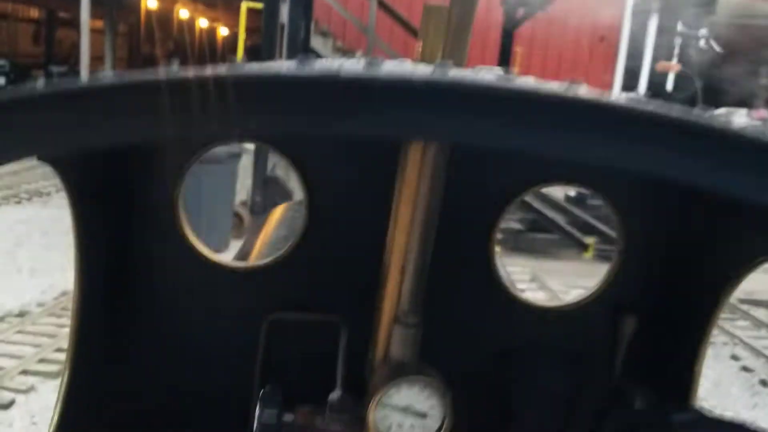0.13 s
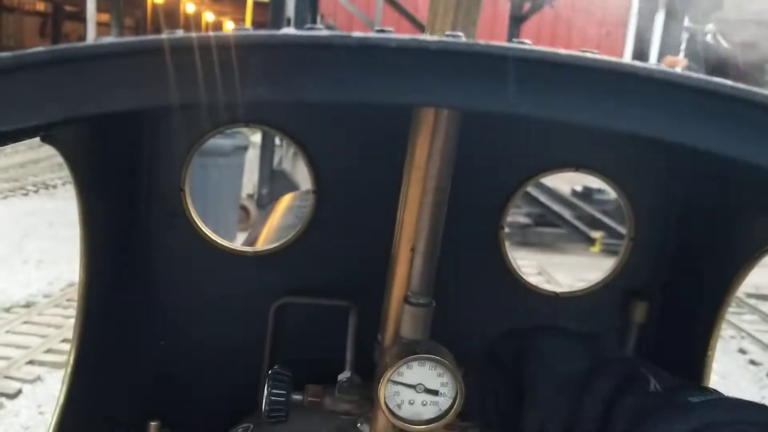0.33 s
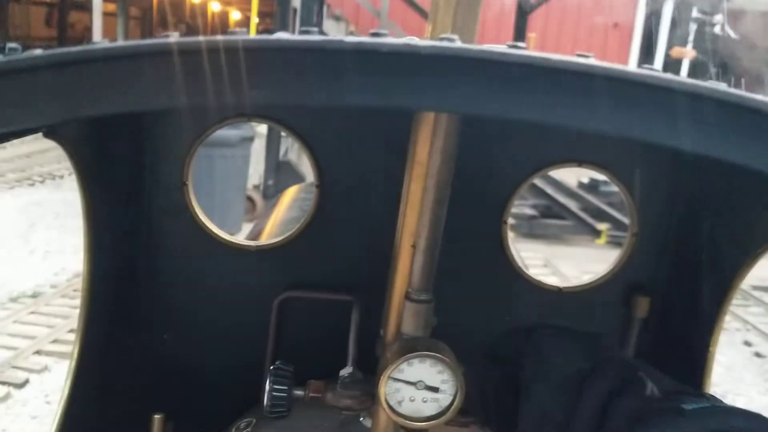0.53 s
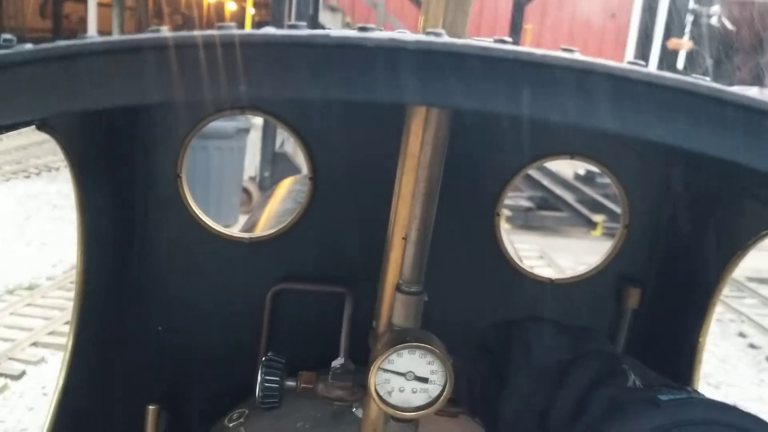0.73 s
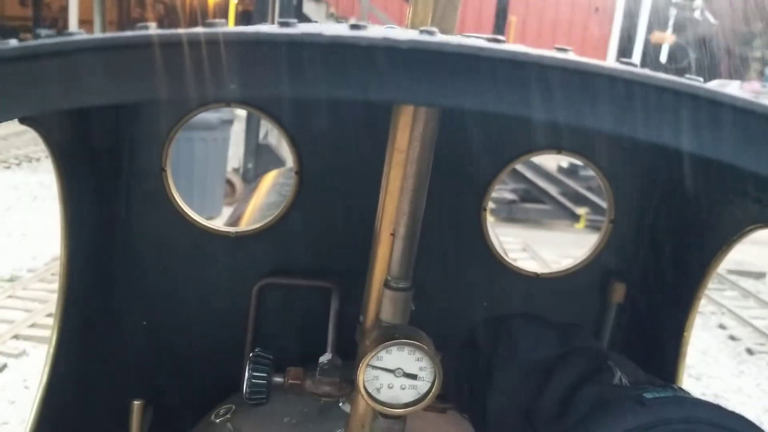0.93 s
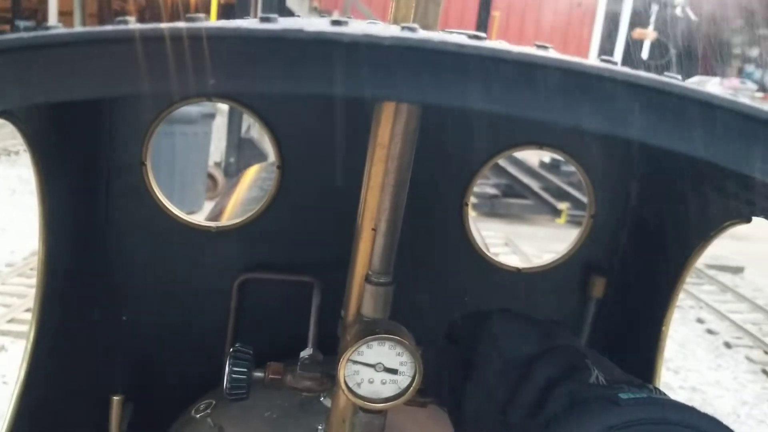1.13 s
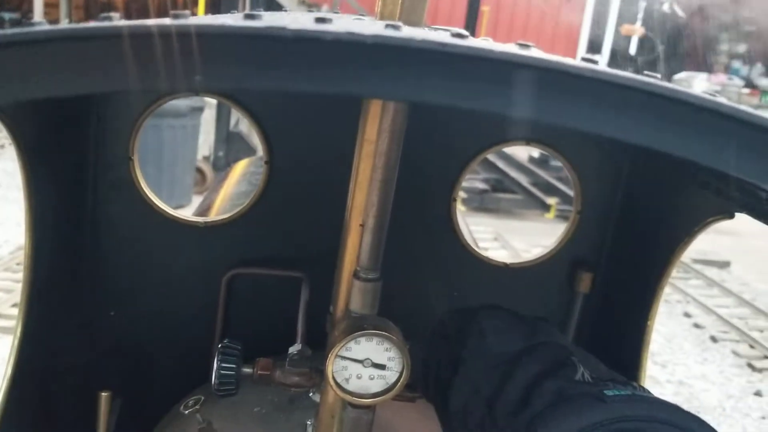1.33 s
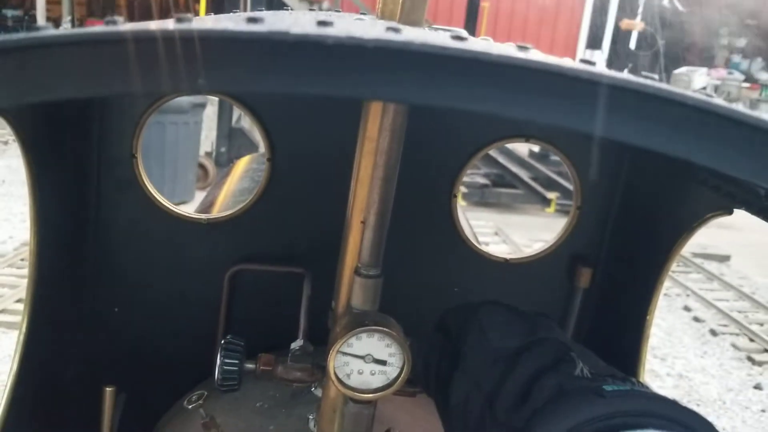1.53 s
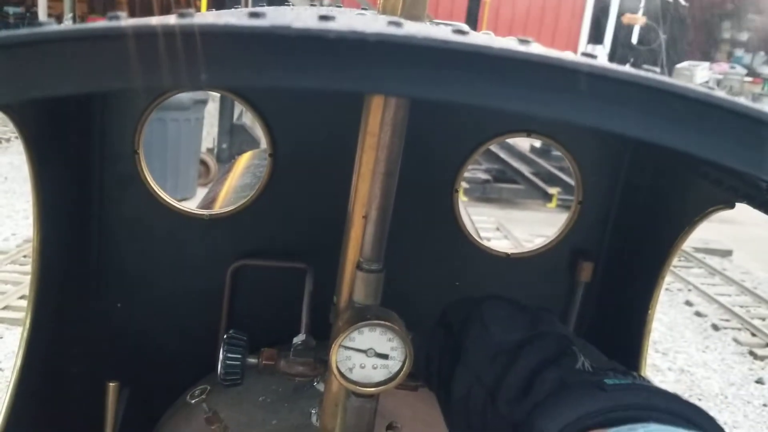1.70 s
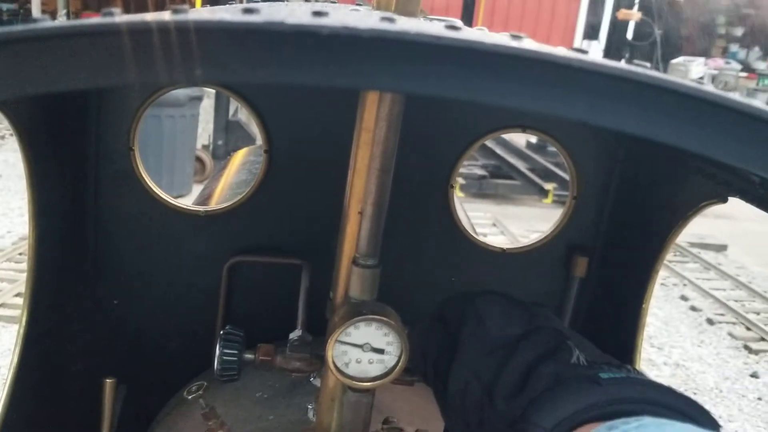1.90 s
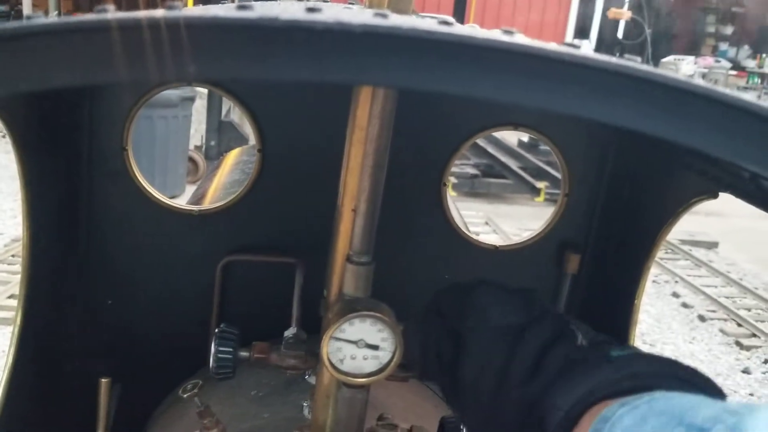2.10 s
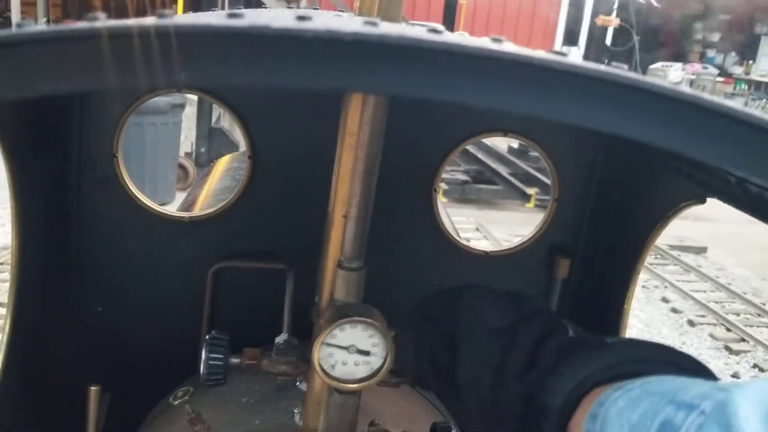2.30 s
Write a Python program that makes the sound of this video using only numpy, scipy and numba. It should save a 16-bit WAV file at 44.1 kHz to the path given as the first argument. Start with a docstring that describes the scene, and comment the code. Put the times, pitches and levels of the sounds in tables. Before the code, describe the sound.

A small locomotive's steam whistle, close up in an open cab. Faint rumble, hum, soft bumps and a tiny scrape come first. At 0.2 seconds steam hisses and splutters, breathy with a hint of pitch, growing. Around 1.0 it locks into a loud, shrill, slightly fluttering high note with bright hiss, held until 2.06, then sags and stops by 2.15, leaving faint echo, thin hiss and rumble.

```python
"""A small steam locomotive's whistle, heard from the cab. Throughout: a hum, a low rumble, a thin hiss from the
valve and a few soft bumps. After a brief scrape the valve opens slowly: coloured noise hisses and splutters, and
noise in resonances only hints at the pipe's note. Then it speaks as jittering sine harmonics, holds for a second
and sags in pitch as the valve shuts. Faint echoes follow; gain control turns everything down as it swells."""
import sys
import numpy as np
from scipy import signal
from scipy.fft import rfft, irfft
from scipy.io import wavfile
from scipy.ndimage import uniform_filter1d, minimum_filter1d
from numba import njit

SR = 44100
rng = np.random.default_rng(int(sys.argv[2]) if len(sys.argv) > 2 else 0)


def pcm_store(signal):
    """Save signal as 16-bit PCM."""
    levels = np.round(np.clip(np.atleast_2d(signal), -1, 1) * 32767)
    wavfile.write(sys.argv[1], SR, levels.astype(np.int16).T)


N = 103635

# The pipe's steady note. Each row: time in seconds, level in dB.
NOTE_LEVEL = [(.975, -31), (.997, -6), (1.012, -0.5), (1.026, 10), (1.055, 4), (1.075, 7.5), (1.11, 10.5),
              (1.4, 16.5), (2.06, 20), (2.12, 9.5), (2.14, -0.5), (2.16, -51)]
# Pitch: rises as steam drives out the air, sags as pressure goes. Each row: time in seconds, pitch in Hz.
PIPE_PITCH = [(.2, 1546), (.42, 1535), (.7, 1595), (1.02, 1618), (1.15, 1598), (1.45, 1596), (2.055, 1592),
              (2.09, 1543), (2.12, 1505), (2.15, 1436)]
# Harmonics of the note. Each row: multiple, level in dB, left minus right in dB, settled flutter as a share.
NOTE_HARMONICS = [(1, -2.5, 11.5, 0.057), (2, -34, 19.5, 0.17), (3, -20, 9.5, 0.26), (4, -48, -15.5, 0.27),
                  (5, -42, -13, 0.46)]
# Steam ringing the pipe without a steady note. Each row: time in seconds, left level in dB, width in Hz.
BREATHY_RING = [(0, -50, 250), (.17, -48, 250), (.22, -28.5, 221), (.5, -22.5, 169), (.78, -17, 70.7),
                (.98, -12.5, 50), (1.4, -16, 70), (2.06, -15.5, 70.8), (2.15, -31, 70), (2.35, -60, 69)]
# Upper resonances of the pipe. Each row: centre in Hz, width in Hz, level in dB.
UPPER_RESONANCES = [(4720, 240, 1), (5254, 220, -5)]
# Swell of the upper resonances. Each row: time in seconds, level in dB.
UPPER_SWELL = [(.17, -65), (.22, -38.5), (.39, -37), (.45, -26), (.98, -17), (1.4, -15.5), (2.06, -32.5),
               (2.13, -38), (2.35, -64)]
# Steam jet. Each row: time in seconds, level in dB.
JET_LEVEL = [(0, -42), (.18, -37), (.222, -12.5), (.285, -13), (.38, -15.5), (.45, -9), (.98, -1),
             (1.2, 0.5), (1.4, 1), (2.06, 2), (2.1, -12), (2.15, -28), (2.35, -35)]
# Colour of the jet. Each row: frequency in Hz, left in dB, right in dB.
JET_COLOUR = [(100, -35, -22.5), (300, -35.5, -36.5), (745, -23, -24), (1310, -16, -29.5),
              (1960, -41.5, -43), (2152, -12, -27.5), (2570, -33, -27.5), (3050, -20.5, -21),
              (3556, -23.5, -35.5), (3907, -15.5, -22), (4900, -20, -26), (5300, -23, -20),
              (6320, -27.5, -20.5), (7690, -30.5, -11), (8720, -14, -16), (9700, -18.5, -2.5),
              (9900, -17.5, -1.5), (11400, -18.5, -2.5), (12730, -13.5, -2), (13500, -26.5, -15.5),
              (15470, -31, -7.5)]
# Wet steam through the half-open valve, on opening and closing. Each row: time in seconds, level in dB.
WET_STEAM_LEVEL = [(.178, -63), (.188, -28.5), (.27, -30.5), (.33, -29), (.6, -30), (1.0, -37.5),
                   (1.25, -62.5), (2.02, -54.5), (2.07, -28), (2.12, -29), (2.17, -53.5)]
# Colour of the wet steam. Each row: frequency in Hz, left in dB, right in dB.
WET_STEAM_COLOUR = [(100, -9, -15), (350, -3.5, -7.5), (756, 0, -4), (1100, -4, -12), (1500, 6.5, -10.5),
                    (1900, -6.5, -24), (2280, 4, -2), (3500, -6.5, -9), (7000, -14.5, -24.5),
                    (16000, -26, -33.5)]
# Leak of the valve. Each row: time in seconds, level in dB.
VALVE_LEAK_LEVEL = [(0, -54), (.2, -50), (2.35, -47.5)]
# Echoes: a short one within the cab and a long one from the yard beyond. Each row: level in dB, t60 in seconds,
# delay in seconds.
YARD_ECHOES = [(-29.5, 0.5, 0.004), (-40.5, 0.83, 0.044)]
# Colour of the standing engine's rumble. Each row: frequency in Hz, left in dB, right in dB.
RUMBLE_COLOUR = [(20.25, -20, -17.5), (42, 5, -11), (78.6, -3.5, -3.5), (159, -5.5, -10),
                 (250, -12.5, -17.5), (330, -16, -15), (600, -23.5, -30), (736, -20.5, -25),
                 (1040, -23, -38), (2330, -26.5, -39), (4860, -32, -44), (8000, -50.5, -49),
                 (16000, -52.5, -55)]
# Rumble. Each row: time in seconds, level in dB.
RUMBLE_SWELL = [(0, -30.5), (.25, -31.5), (.5, -34), (.95, -31.5), (1.5, -28), (2.35, -26.5)]
# Soft low bumps. Each row: start in seconds, level in dB, pitch in Hz, rise and decay constant in seconds.
SOFT_BUMPS = [(.003, -18.5, 69.4, 0.013), (.108, -23, 73, 0.0072), (.276, -13, 83.5, 0.0061),
              (0.636, -27, 70.2, .018), (.92, -24.5, 58, 0.034), (1.232, -14.5, 74.4, .012),
              (1.813, -0.5, 84, 0.0061)]

JITTER_HZ, JITTER_RATE_HZ, FLUTTER_RATE_HZ = 2.28, 125, 61  # jitter and flutter once settled
UNSTEADY_SHARE, SETTLE_S = 2.5, 0.23  # extra wobble when the pipe first speaks, and how fast it dies
FULL_PRESSURE_HZ, OVERTONE_LOSS_DB_PER_HZ = 1592, 0.3
BREATHY_PAN_DB, UPPER_PAN_DB = 9.5, 4  # all pans: left minus right
JET_LIKENESS, RUMBLE_LIKENESS = 0.78, 0.96  # share of noise power common to both sides
JET_FLICKER_DB, JET_FLICKER_RATE_HZ, SPIT_DB, SPIT_RATE_HZ = 0.93, 36, 1, 550
SPLUTTER_ROUGH_DB, SPLUTTER_RATE_HZ = 4.5, 78
LEAK_HZ, LEAK_WIDTH_HZ, LEAK_PAN_DB = 10880, 940, -13.5
PIPE_LAG_S, JET_LAG_S = 0.00017, 0.000354  # how much later the left microphone hears them
# the overtones carry into the yard better than the fundamental
ECHO_BRIGHT_HZ, ECHO_BRIGHT_WIDTH_HZ, ECHO_BRIGHT_DB = 4200, 1100, 8
HUM_HZ, HUM_DB, HUM_WAVER_DB, HUM_DRIFT_HZ = 227, -36, 0.5, 1.2
BUMP_PAN_DB, BUMP_NOISE_SHARE, BUMP_NOISE_HZ = 6.5, 0.26, 120
SCUFF_S, SCUFF_DB, SCUFF_HZ, SCUFF_WIDTH_S = 0.102, -37.5, 625, 0.0079
GAIN_THRESHOLD, GAIN_FALL_DB_PER_S = 0.31, 646.0  # fall per unit of excess over the threshold
LIMITER_CEILING, TOP_HZ = 0.97, 15800


def undb(db):
    """Amplitude factor for a level in dB."""
    return 10 ** (np.asarray(db) / 20)


def curve(table, axis=1):
    """A column of a table, joined by straight lines in time."""
    rows = np.array(table, float)
    return np.interp(np.arange(N) / SR, rows[:, 0], rows[:, axis])


def unit(x):
    """Scale to a standard deviation of 1."""
    return x / np.std(x)


def pan(db):
    """Left and right gains for a level difference."""
    return undb(np.array([[db], [-db]]) / 2)


def walk(rate_hz):
    """Smooth random wandering with a spread of 1."""
    f_hz = np.fft.rfftfreq(N, 1 / SR)
    spectrum = rfft(rng.standard_normal(N))
    return unit(irfft(spectrum / (1 + (2 * f_hz / rate_hz) ** 2), N))


def coloured(table, likeness):
    """Stereo noise with a spectrum for each side; the louder side has rms 1."""
    rows = np.array(table, float)
    f_hz = np.fft.rfftfreq(N, 1 / SR) + 1  # keeps the log finite
    common = np.sqrt(likeness) * rng.standard_normal(N)
    noise = common + np.sqrt(1 - likeness) * rng.standard_normal((2, N))
    gains = undb([np.interp(np.log(f_hz), np.log(rows[:, 0]), side_db) for side_db in rows.T[1:]])
    out = irfft(rfft(noise) * gains, N)
    return out / out.std(axis=1).max()


@njit
def resonate(x, hz, width_hz):
    """Band-pass, a state-variable filter whose centre and width move."""
    y, band, low = np.empty(len(x)), 0., 0.
    for i in range(len(x)):
        g = np.tan(np.pi * hz[i] / SR)
        damping = width_hz[i] / hz[i]
        v = (band + g * (x[i] - low)) / (1 + g * (g + damping))
        band = 2 * v - band
        low += 2 * g * v
        y[i] = damping * v
    return y


def ring(hz, width_hz):
    """Noise in a steep-sided resonance, rms 1."""
    hz, width_hz = hz * np.ones(N), width_hz * np.ones(N)
    noise = rng.standard_normal(N) / np.sqrt(width_hz)  # even level as the width moves
    return unit(resonate(resonate(noise, hz, width_hz), hz, 3 * width_hz))


def note():
    """The pipe locks on to a nearly pure tone, unsteady at first, its overtones fluttering."""
    pitch_hz, level_db = curve(PIPE_PITCH), curve(NOTE_LEVEL)
    age_s = np.maximum(np.arange(N) / SR - NOTE_LEVEL[1][0], 0)
    wobble = 1 + UNSTEADY_SHARE * np.exp(-age_s / SETTLE_S)
    jitter_hz = JITTER_HZ * wobble * walk(JITTER_RATE_HZ)
    phase = 2 * np.pi * np.cumsum(pitch_hz + jitter_hz) / SR
    sag_hz = np.maximum(FULL_PRESSURE_HZ - pitch_hz, 0)
    # overtones need a settled tone at full pressure
    overtone_gain = undb(-OVERTONE_LOSS_DB_PER_HZ * sag_hz) / wobble
    out = 0
    for k, (multiple, db, pan_db, flutter) in enumerate(NOTE_HARMONICS):
        shake = 1 + flutter * wobble * (walk(FLUTTER_RATE_HZ) + 1j * walk(FLUTTER_RATE_HZ))
        tone = np.real(shake * np.exp(1j * multiple * phase))
        size = undb(db) * (overtone_gain if k else 1)
        out = out + size * pan(pan_db) * tone
    sounding = level_db > max(NOTE_LEVEL[0][1], NOTE_LEVEL[-1][1])
    return np.sqrt(2) * out * undb(level_db) * sounding


def breathy_pipe():
    """Turbulence rings the pipe's lowest resonance, and its upper ones more as the valve opens."""
    first = ring(curve(PIPE_PITCH), curve(BREATHY_RING, axis=2))
    first = first * undb(curve(BREATHY_RING) - BREATHY_PAN_DB / 2)
    upper = sum(undb(db) * ring(hz, width_hz) for hz, width_hz, db in UPPER_RESONANCES)
    upper = upper * undb(curve(UPPER_SWELL))
    return first * pan(BREATHY_PAN_DB) + upper * pan(UPPER_PAN_DB)


def jet():
    """Steam hisses from the slot, flickering and spitting slightly."""
    flicker_db = JET_FLICKER_DB * walk(JET_FLICKER_RATE_HZ) + SPIT_DB * walk(SPIT_RATE_HZ)
    return coloured(JET_COLOUR, JET_LIKENESS) * undb(curve(JET_LEVEL) + flicker_db)


def splutter():
    """Wet steam leaves the half-open valve with a rough, darker rush."""
    rough_db = SPLUTTER_ROUGH_DB * walk(SPLUTTER_RATE_HZ)
    return coloured(WET_STEAM_COLOUR, JET_LIKENESS) * undb(curve(WET_STEAM_LEVEL) + rough_db)


def leak():
    """Even when shut, the valve lets out a thin, high hiss."""
    return ring(LEAK_HZ, LEAK_WIDTH_HZ) * undb(curve(VALVE_LEAK_LEVEL)) * pan(LEAK_PAN_DB)


def ports(x, lag_s):
    """The left microphone hears the sound a little later than the right."""
    f_hz = np.fft.rfftfreq(N, 1 / SR)
    late = irfft(rfft(x[0]) * np.exp(-2j * np.pi * f_hz * lag_s), N)
    return np.array([late, x[1]])


def yard(x):
    """Faint echoes as decaying noise: a short one within the cab and a long one from the yard."""
    t_s = np.arange(SR) / SR
    response = 0
    for db, t60_s, delay_s in YARD_ECHOES:
        tail = rng.standard_normal((2, SR)) * undb(-60 * t_s / t60_s) * (t_s > delay_s)
        energy = np.sum(tail ** 2, axis=1, keepdims=True)
        response = response + undb(db) * tail / np.sqrt(energy)
    hz, width_hz = ECHO_BRIGHT_HZ * np.ones(N), ECHO_BRIGHT_WIDTH_HZ * np.ones(N)
    bright = np.array([resonate(side, hz, width_hz) for side in x])
    return signal.fftconvolve(x + undb(ECHO_BRIGHT_DB) * bright, response, axes=1)[:, :N]


def bumps():
    """Dull thuds of a few cycles each, with low noise mixed in."""
    t_s, out = np.arange(N) / SR, 0
    band_hz = np.full(N, 1. * BUMP_NOISE_HZ)
    noise = resonate(rng.standard_normal(N), band_hz, band_hz)
    rustle = BUMP_NOISE_SHARE * unit(resonate(noise, band_hz, 2 * band_hz))
    for start_s, db, hz, decay_s in SOFT_BUMPS:
        age_s = np.maximum(t_s - start_s, 0)
        swell = age_s / decay_s * np.exp(1 - age_s / decay_s)
        out = out + undb(db) * swell * (np.sin(2 * np.pi * hz * age_s) + rustle) / 2
    return out * pan(BUMP_PAN_DB)


def scuff():
    """A brief scrape in the cab before the valve opens: a short swell of band noise."""
    swell = np.exp(-((np.arange(N) / SR - SCUFF_S) / SCUFF_WIDTH_S) ** 2)
    return undb(SCUFF_DB) * swell * ring(SCUFF_HZ, SCUFF_HZ) * pan(BUMP_PAN_DB)


def engine():
    """Low rumble of coloured noise with a wavering hum, a drifting sine."""
    phase = 2 * np.pi * np.cumsum(HUM_HZ + HUM_DRIFT_HZ * walk(20)) / SR
    hum = np.sqrt(2) * np.sin(phase) * undb(HUM_DB + HUM_WAVER_DB * walk(29))
    rumble = coloured(RUMBLE_COLOUR, RUMBLE_LIKENESS) * undb(curve(RUMBLE_SWELL))
    return hum + rumble


def scene():
    """Whistle with its echo, over the standing engine."""
    whistle = ports(jet() + leak(), JET_LAG_S)
    whistle = whistle + ports(splutter() + breathy_pipe() + note(), PIPE_LAG_S)
    return whistle + yard(whistle) + engine() + bumps() + scuff()


@njit
def turn_down(peak, threshold, fall_db_per_s):
    """Gain that sinks while the output is over the threshold, and then stays there."""
    gain, g = np.empty(len(peak)), 1.
    for i in range(len(peak)):
        excess = max(peak[i] * g - threshold, 0.)
        g *= 10 ** (-fall_db_per_s * excess / SR / 20)
        gain[i] = g
    return gain


def record(dry):
    """Gain control turns loud sound down, a limiter catches remaining peaks, and the top is cut."""
    out = dry * turn_down(np.abs(dry).max(axis=0), GAIN_THRESHOLD, GAIN_FALL_DB_PER_S)
    headroom = LIMITER_CEILING / np.maximum(np.abs(out).max(axis=0), LIMITER_CEILING)
    out = out * uniform_filter1d(minimum_filter1d(headroom, size=300), size=300)  # sizes in samples
    low_pass = signal.ellip(10, .2, 80, TOP_HZ, fs=SR, output="sos")
    return signal.sosfilt(low_pass, out)


dry = scene()
out = record(dry)
pcm_store(out)
```